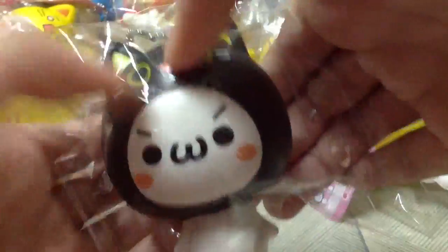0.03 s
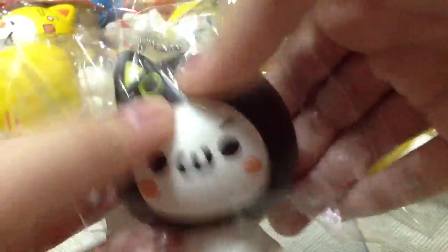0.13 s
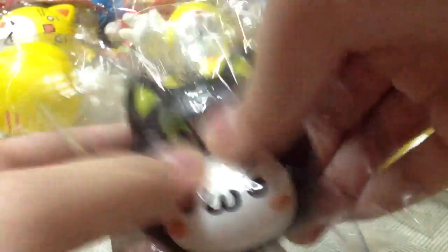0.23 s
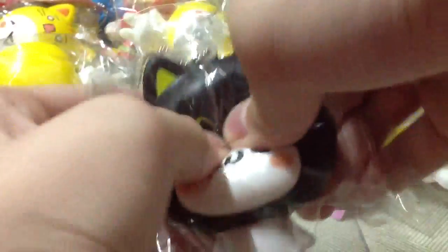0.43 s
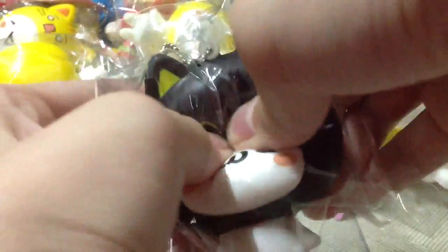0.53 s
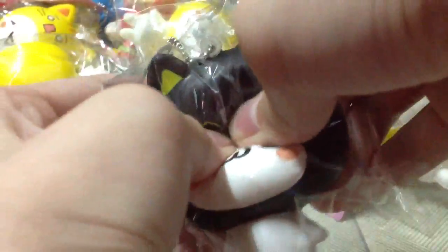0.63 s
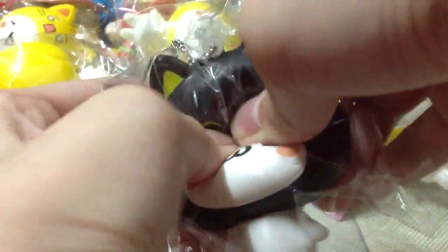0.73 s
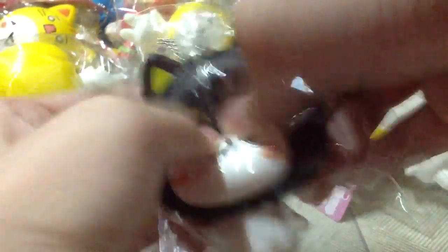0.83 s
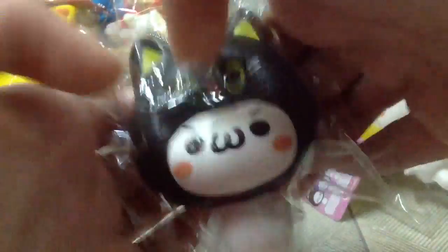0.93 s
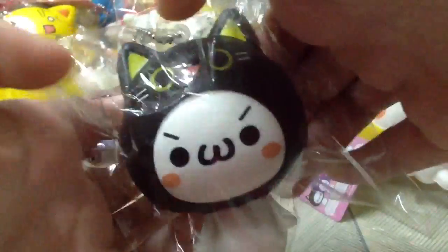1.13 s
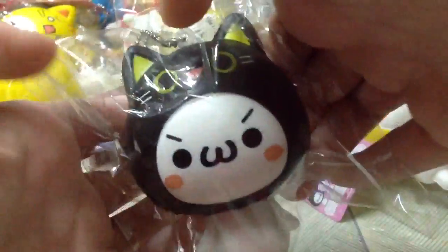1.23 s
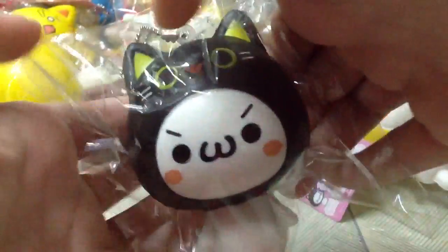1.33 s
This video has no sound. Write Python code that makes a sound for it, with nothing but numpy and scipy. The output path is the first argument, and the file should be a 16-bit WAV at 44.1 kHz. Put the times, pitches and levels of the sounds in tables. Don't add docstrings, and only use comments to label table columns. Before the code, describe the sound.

Crisp plastic film crackles and snaps close up while fingers press a bagged squishy toy indoors

```python
import sys
import numpy as np
from scipy import signal
from scipy.fft import rfft, irfft
from scipy.io import wavfile
from scipy.ndimage import uniform_filter1d

SR = 44100
rng = np.random.default_rng(int(sys.argv[2]) if len(sys.argv) > 2 else 0)


def boost_factor(decibels):
    exponent = np.asarray(decibels, float) / 20
    return 10 ** exponent


def wav_out(sig):
    wavfile.write(sys.argv[1], SR, np.round(np.clip(np.atleast_2d(sig).T, -1, 1) * 32767).astype(np.int16))


N = 61739

# [t/s, peak level/dB, main ring f/Hz,
# treble level/dB, body level/dB]; the last two are against the middle
CREASE_SNAPS = [(0.0089, -25.5, 4000, 1, -9), (0.0259, -35.0, 4950.0, -5, 4),
                (0.0299, -24.5, 4050.0, -6, -15), (0.042, -28, 11600, 8, -15), (0.0495, -24.5, 6200, 1, -5),
                (0.0725, -22, 11000, 9.5, -16.5), (0.0754, -28, 6720.0, 8, 6), (0.0853, -31, 11020.0, 2, 1.5),
                (0.109, -27, 12100, 2, 0), (0.1338, -29.0, 5200, -9, -4), (0.1583, -37, 3960.0, -16.5, -5),
                (0.1669, -36, 3300, -12, -7), (0.1814, -42, 5240, -16, 3.5),
                (0.1902, -17.5, 5680, -10, -32.5), (0.2025, -21.5, 4500, 5, -11), (0.2082, -18, 5250, -5, -7),
                (0.2138, -28, 8180.0, -1, -6.5), (0.2172, -16, 11200, 7, -4), (0.228, -5.5, 4936, 2.5, -15.5),
                (0.2329, -14.5, 10200, 4, -9.5), (0.2426, -27, 9850, 8, -13), (0.2603, -20, 3700.0, 0, -5),
                (0.2629, -22.0, 1660, -4, 0.5), (0.2703, -18.5, 8900, 3, -11), (0.2762, -26.5, 9800, 3, 3),
                (0.2889, -32.5, 4950.0, -10.5, -13.5), (0.2984, -19.5, 8500, 8, -7),
                (0.3068, -26, 7500, -10, -37.5), (0.315, -23.5, 10600, 20, -23.5),
                (0.3213, -27, 7970.0, 5.5, -7), (0.334, -25, 8060, -9.5, -9), (0.3415, -13.5, 5970, -6, -14),
                (0.3649, -30.5, 6290.0, -29, 0), (0.3701, -17, 5020, -27, -11),
                (0.3782, -28, 5080.0, -11, -6), (0.3837, -12.5, 4920, -2.5, -5),
                (0.388, -14.5, 5040.0, -13.5, -9),
                (0.3914, -21.5, 7540.0, 4, -5), (0.4063, -20.5, 9900, -5, -4),
               (0.432, -24, 4870.0, -4.5, -3.5), (0.4475, -22.5, 4550, -4, -20),
               (0.4467, -13.5, 4900, -0.5, -27), (0.4535, -23.5, 4700, -10, -15),
               (0.4644, -22, 4500, -26, -5.5), (0.4876, -26.5, 11900, 10, -11),
               (0.4902, -20.5, 6600, -7, -19.5), (0.5013, -25, 3680, -22.5, -6),
               (0.5161, -20.5, 10420, -5, -15), (0.5207, -25, 6700, -13, -19),
               (0.5275, -20, 12490.0, -1, -8), (0.5405, -18.5, 3460, 0.5, -18),
               (0.5532, -22, 10500, 4, -5.5), (0.5922, -26, 5500, -3, -15),
               (0.606, -41.0, 4690.0, -19, -20), (0.62, -42, 6080, -4, -16.5), (0.63, -28, 4430, -2, -16),
               (0.6431, -23.5, 3640, -19.5, 10), (0.6449, -8, 4824, -13, -17.5),
               (0.669, -30.5, 3624, -18.5, -6), (0.6899, -14.5, 4930, -4, -43),
               (0.7222, -37.5, 1210.0, -8, 3), (0.7716, -33, 6930.0, -9, -23), (0.775, -29, 9230, 1, -9.5),
               (0.7793, -31, 14080.0, -7.5, -14), (0.7821, -28.5, 4170, -16, -16.5),
               (0.792, -33, 1380.0, 4, 8), (0.8068, -48, 4180.0, -4, 1.5), (0.8174, -29, 4240, -5, -7),
               (0.8195, -24.5, 5340.0, -12.5, -1), (0.8287, -23.5, 5000.0, -4, -12),
               (0.8472, -20.5, 6680.0, 8, -6.5), (0.8579, -17.5, 11760.0, -1.5, -17),
               (0.8648, -8.5, 11930.0, 14, -2), (0.8674, -14, 12800, 7, -5),
                (0.8711, -12.5, 10200, -1, -14), (0.8759, -18, 10500, 11, -22),
                 (0.884, -13.5, 4720, -3, -4), (0.8899, -16, 3730, 0, -13), (0.8918, -18, 8100, 0, -8),
                 (0.8996, -3, 11200, 10.5, -11), (0.904, -12, 4170, 6, -17), (0.9081, -13.5, 4700, 5, -5),
                 (0.9136, -6.5, 14600, 12, -23.5), (0.9171, -2, 5180, 9, -24),
                 (0.9247, -12, 10570, 2.5, -8), (0.9322, -9, 3880.0, 2, -10),
                 (0.9409, -10, 7220, -6, -38.5), (0.9453, -17.5, 4040, 8, -23.5),
                 (0.967, -31, 3600, -2.5, -20.5), (0.9716, -15, 9200, 4, -14),
                 (0.975, -17.5, 5340, -2, -10), (0.9854, -30, 5210.0, -5, 1), (0.9913, -16, 4270, 3, -5),
                 (0.9957, -15, 4200, 12, 0), (0.9979, -15.5, 5100, 1, -3), (1.0378, -27.5, 4560, 1.5, -14),
                 (1.0697, -34.0, 8910.0, 4, -4), (1.0764, -22.0, 7410.0, -15.5, -23),
                 (1.0882, -23, 3100.0, 1, -3), (1.1034, -27, 7500, -3, -14), (1.11, -31, 5040.0, -17, -5),
                 (1.1319, -21.5, 10250.0, 19, -9), (1.1399, -22.5, 6790, -31.5, -2),
                 (1.1998, -20.5, 3740, -1, -1), (1.211, -24.5, 10300, 3, -6),
                 (1.239, -19.5, 4150, -5.5, -9.5), (1.259, -34.5, 4000, -6, -4),
                 (1.299, -36.5, 4010.0, -12, -12), (1.3089, -28.0, 4860, -2.5, -18),
                 (1.3582, -30.5, 1836, 0, 1), (1.3628, -26, 2940, -15.5, 0)]
# [t/s, peak level/dB, f/Hz]
PANEL_POPS = [(0.0095, -42.5, 414), (0.0836, -41, 470), (0.1294, -32.5, 590), (0.1587, -34, 614),
              (0.181, -37.5, 576), (0.1967, -32, 543), (0.2054, -32.5, 630), (0.228, -31.5, 500),
              (0.259, -29.5, 630), (0.3407, -30.5, 770), (0.3868, -31, 900), (0.4516, -36, 1030),
              (0.6453, -36, 814), (0.7218, -32.5, 597), (0.8178, -38.5, 766), (0.8831, -21.5, 699),
              (0.9394, -25, 510), (0.9923, -31.5, 387), (0.9895, -42, 80), (1.0762, -37.5, 514),
              (1.0877, -29.5, 810), (1.169, -38.5, 470), (1.1969, -34, 453), (1.238, -38, 485),
              (1.259, -32.5, 500), (1.274, -36.5, 552), (1.2981, -36.5, 614), (1.3553, -37.5, 512)]
# [t/s, crackle level/dB]
FILM_MOTION = [(0, -44.5), (.03, -50), (0.172, -45), (0.211, -39.5), (0.342, -36), (0.409, -48.5),
               (.48, -66), (0.533, -43.5), (0.57, -52.5), (.63, -55.5), (.7, -50.5), (.765, -58),
               (0.854, -38), (0.882, -22.5), (0.945, -24), (1.021, -51.5), (1.06, -54), (1.4, -77)]
# [start t/s, length t/s, crackle level/dB]
FOLD_FLURRIES = [(0.068, 0.0194, -44.5), (0.263, .012, -34), (0.376, 0.02454, -33), (0.425, 0.015, -38),
                 (0.438, 0.013, -40), (0.487, 0.013, -40.5), (0.646, 0.00468, -34.5),
                 (0.767, 0.0426, -55.5), (0.816, 0.006, -45), (0.97, 0.01, -55), (.991, 0.017, -29.5),
                 (1.071, 0.0124, -34.5), (1.141, 0.013, -52), (1.199, 0.0295, -44.5), (1.248, 0.011, -47),
                 (1.298, 0.017, -46), (1.352, 0.014, -38.5)]
# [f/Hz, level/dB]
CRACKLE_COLOUR = [(100, -16.5), (200, -6.5), (600, -8.5), (1200, -10.5), (2500, -2.5), (5000, 1.5),
                  (11000, -0.5), (15500, -8.5)]
# [f/Hz, level/dB]
HUM_COLOUR = [(25, 14.5), (90, -6), (200, 9), (380, 3.5), (700, -1.5), (3000, -9.5), (15500, -16.5)]
# [lowest f/Hz, pitch ratio from one patch to the next]
FILM_PATCHES = [
    (1100, 1.4),
    (3300, 1.37),
    (8500, 1.21),
]

SIZE, LEAD = 2048, 200


def evened(x):
    return x / np.sqrt(np.mean(x ** 2) + 1e-20)


def coloured(x, points):
    f, db = np.transpose(points)
    bin_hz = np.fft.rfftfreq(len(x), 1 / SR)
    gain = boost_factor(np.interp(np.log(bin_hz + 1), np.log(f), db))
    return irfft(rfft(x) * gain, len(x))


def ring(hz, q):
    ratio = np.fft.rfftfreq(SIZE, 1 / SR) / np.reshape(hz, (-1, 1)) + 1e-9
    return 1 / (1 + 1j * q * (ratio - 1 / ratio))


def place(times, peaks_db, sounds, size):
    top = np.sqrt(2 * uniform_filter1d(sounds ** 2, size=size, axis=1).max(axis=1))
    mix = np.zeros(N + SIZE + LEAD)
    at = np.round(times * SR).astype(int)[:, None] + np.arange(SIZE)
    np.add.at(mix, at, sounds * (boost_factor(peaks_db) / top)[:, None])
    return mix[LEAD:N + LEAD]


def hum():
    noise = rng.standard_normal(N + 1)
    return boost_factor(-54) * evened(coloured(noise, HUM_COLOUR))[:N]


def room(x):
    t60_s, first_wall_s = .18, .004
    t = np.arange(SR // 3) / SR
    tail = rng.standard_normal(len(t)) * boost_factor(-60 * t / t60_s) * (t > first_wall_s)
    return signal.fftconvolve(x, tail / np.linalg.norm(tail))[:N]


def crackle():
    usual_rate, busier, spread_db = 900, .6, 5.4
    t = np.arange(N) / SR
    s, db = np.transpose(FILM_MOTION)
    level = boost_factor(np.interp(t, s, db))
    for start, length, flurry_db in FOLD_FLURRIES:
        swell = np.sin(np.pi * np.clip((t - start) / length, 0, 1)).clip(0)
        level = level + boost_factor(flurry_db) * np.sqrt(swell)

    rate = usual_rate * (level / boost_factor(-45)) ** busier
    cracks = rng.random(N) < rate / SR
    size = boost_factor(spread_db * np.minimum(rng.exponential(1, N), 3)) * cracks
    size = size * level / np.sqrt(rate / usual_rate)

    patch = rng.integers(0, 24, N)
    hz = np.geomspace(330, 15000, num=24)
    push = rng.standard_normal((24, SIZE)) * np.exp(-np.arange(SIZE) / SR / .0004)
    tilt = np.sqrt(14000 / hz)[:, None] ** 0.24
    grains = irfft(rfft(push) * (ring(hz, 1.16) * tilt + 0.23))

    out = np.zeros(N)
    for k, grain in enumerate(grains):
        out += signal.oaconvolve(size * (patch == k), grain / np.linalg.norm(grain))[:N]
    out = coloured(np.r_[out, 0], CRACKLE_COLOUR)[:N]
    return out / np.sqrt(np.mean((out / level) ** 2))


def pops():
    s, db, hz = np.transpose(PANEL_POPS)
    fade = np.exp(-np.abs(np.arange(SIZE) - LEAD) / SR / .002)
    push = rng.standard_normal((len(s), SIZE)) * fade * .025
    push[:, LEAD] = np.sign(push[:, LEAD])
    sounds = irfft(rfft(push) * ring(hz, 1.4) * ring(hz, 1.2))
    return place(s, db - 1.5, sounds, size=90)


def snaps():
    s, db, hz, treble_db, body_db = np.transpose(CREASE_SNAPS)
    t = (np.arange(SIZE) - LEAD) / SR
    draw = rng.standard_normal((len(s), 2, SIZE))
    pick = rng.random((len(s), 9))

    clumps = np.abs(uniform_filter1d(draw[:, 1], size=30, axis=1)) * 5.5
    creak = boost_factor(-30) * clumps * np.exp(t / .0015)
    tiny_steps = boost_factor(-15) * np.exp(-t / .0004)
    rattle = boost_factor(-23) * clumps * np.exp(-t / .0026)
    around = draw[:, 0] * np.where(t < 0, creak, tiny_steps + rattle)
    push = rfft(np.where(t == 0, np.sign(draw[:, 0]), around))

    main_q = 4 * np.sqrt(hz / 4000)[:, None]
    push = push * (1 + ring(hz, main_q) / boost_factor(-10))

    out = 0
    shares_db = (body_db, 0 * s, treble_db)
    for b, ((low_hz, step), share_db) in enumerate(zip(FILM_PATCHES, shares_db)):
        part = 0
        for k in range(3):
            patch_hz = low_hz * step ** (k + pick[:, 3 * b + k])
            part = part + (-1) ** (k + b) * ring(patch_hz, 1.7)
        part = part * push * ring(low_hz * step ** 1.5, 1) ** 2
        out = out + part * (boost_factor(share_db) / np.linalg.norm(part, axis=1))[:, None]
    return place(s, db, irfft(out), size=30)


def scene():
    bag = crackle() + pops() + snaps()
    return (hum() + boost_factor(-23.5) * room(bag) + bag)[None]


def top_cut(x):
    return signal.sosfilt(signal.butter(12, 17310, fs=SR, output="sos"), x)


def record(dry):
    edge_hz, edge_db = 15300, -40
    squashed = .7 * np.tanh(dry / .7)
    low_cut = signal.butter(2, 125, "high", fs=SR, output="sos")
    x = signal.sosfilt(low_cut, squashed)
    under = signal.oaconvolve(x, signal.firwin(255, edge_hz, fs=SR)[None], "same")
    mix = under + boost_factor(edge_db) * (x - under)
    return top_cut(mix)


dry = scene()
out = record(dry)
wav_out(out)
```